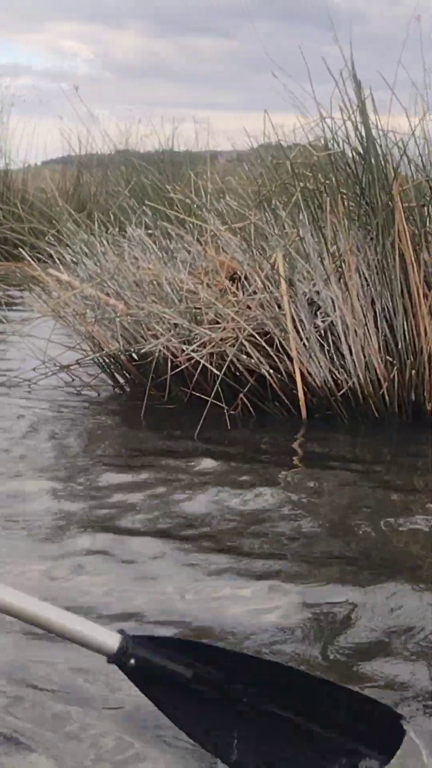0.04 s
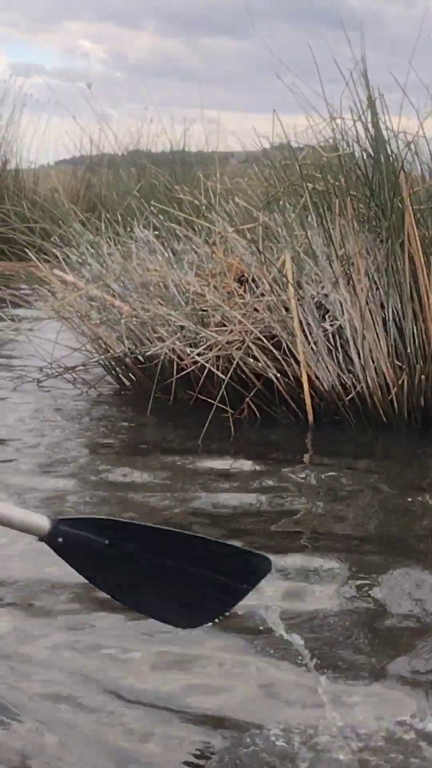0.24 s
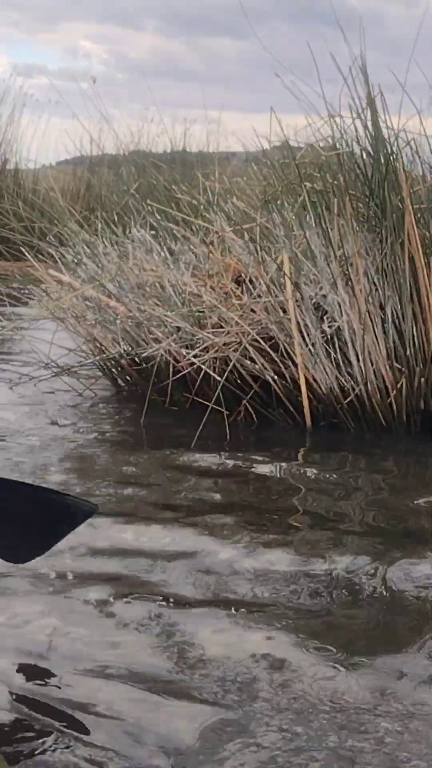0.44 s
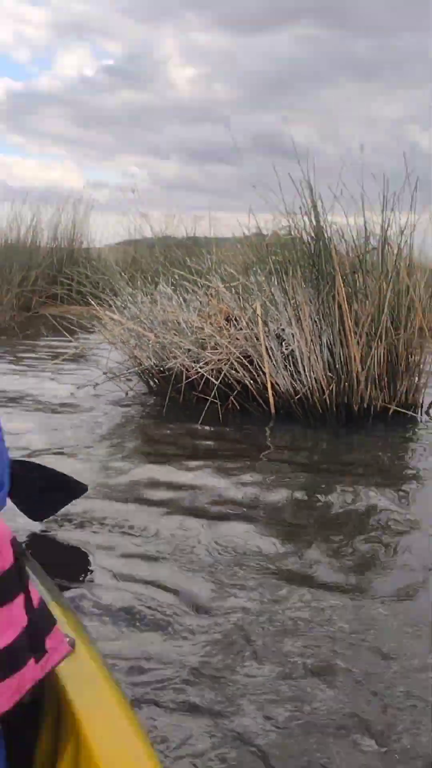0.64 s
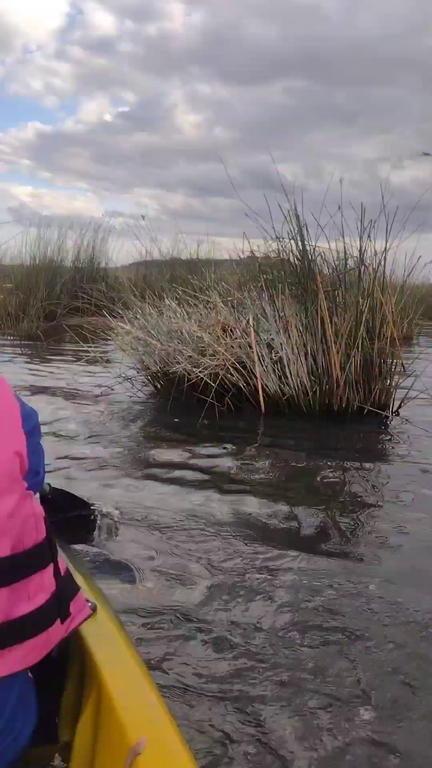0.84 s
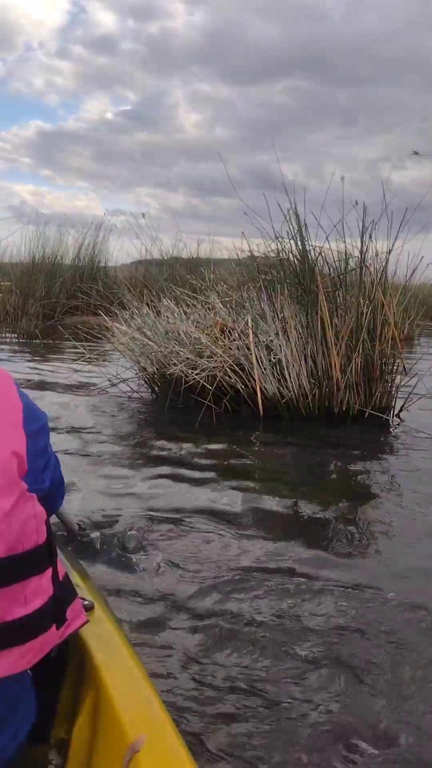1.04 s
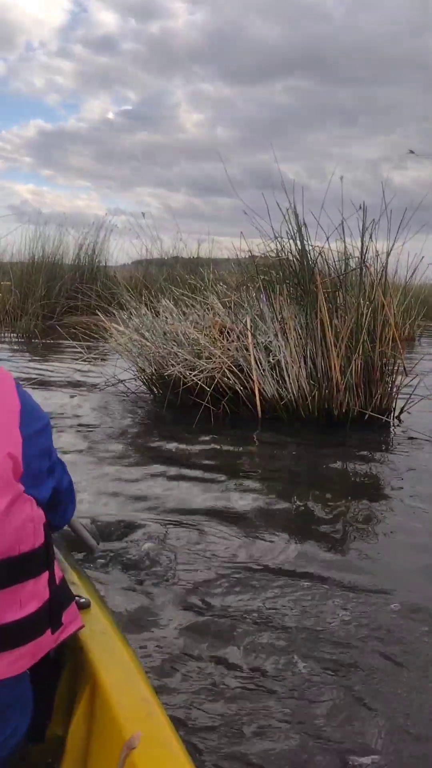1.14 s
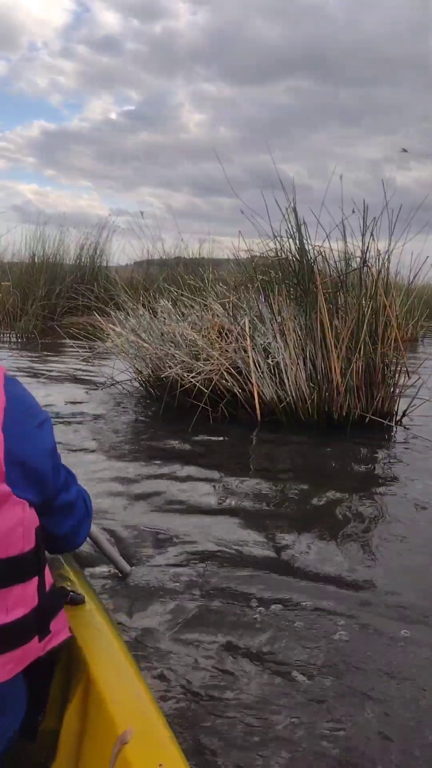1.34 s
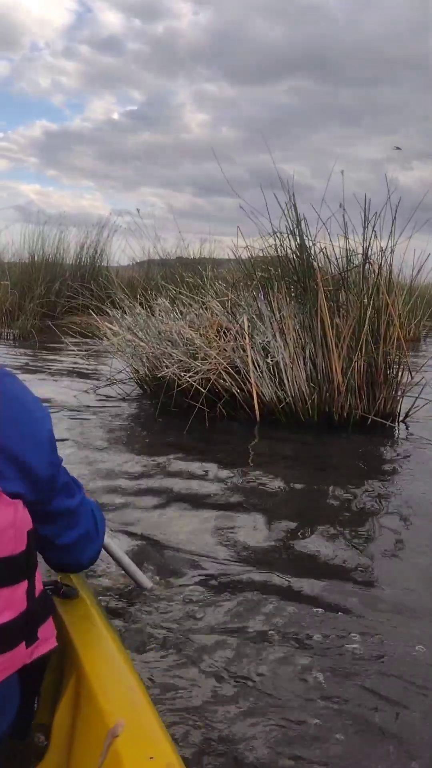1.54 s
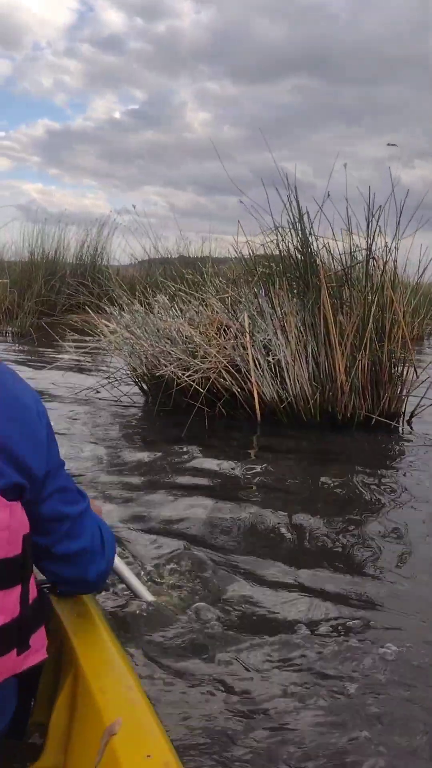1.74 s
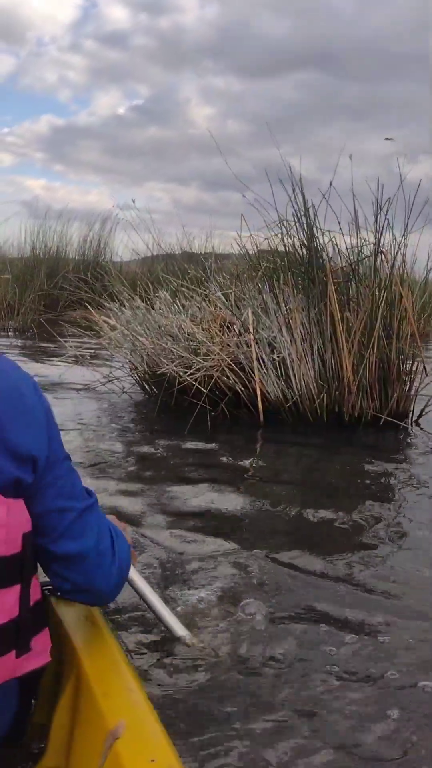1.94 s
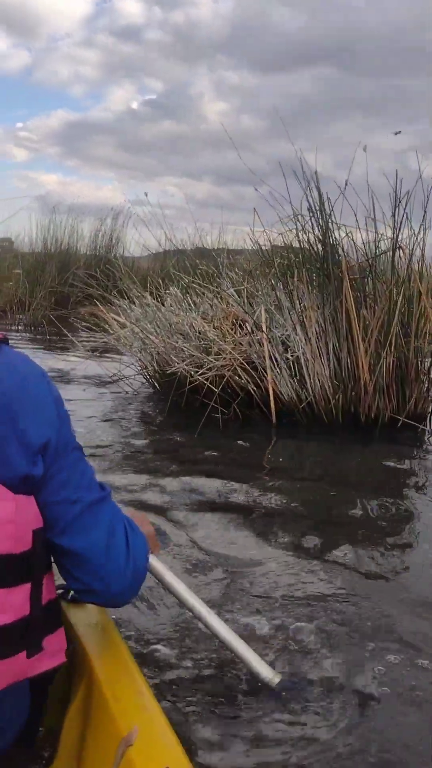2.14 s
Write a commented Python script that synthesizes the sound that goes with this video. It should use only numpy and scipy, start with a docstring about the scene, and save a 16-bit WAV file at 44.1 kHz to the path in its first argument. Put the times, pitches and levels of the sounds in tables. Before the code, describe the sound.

Close hand-held stereo recorder outdoors on open water: patchy low gurgling throughout, a quick bright spray with rubbing clicks, an overloaded jolt, another knock, then calmer bubbling, plops and small drips.

```python
"""Water gurgles along the hull of a kayak among reeds, heard by a small hand-held two-port recorder.
Gurgle, splash and mist are patchy noise mixed with random bubbles; plops, drips and ticks are short fading sines.
A grip rubs the case near the left port: stick-slip clicks ring the case under a thin hiss.
One jolt, a slow pressure curve with thuds and shudders, drives both membranes to their stop. A low rumble runs below."""
import sys
import numpy as np
from scipy import signal
from scipy.fft import rfft, irfft, next_fast_len
from scipy.io import wavfile
from scipy.ndimage import uniform_filter1d, map_coordinates

SR = 44100
rng = np.random.default_rng(int(sys.argv[2]) if len(sys.argv) > 2 else 0)


def store_pcm(level_fs):
    """Save levels as 16-bit WAV."""
    pcm = np.round(np.clip(level_fs, -1, 1) * 32767).astype(np.int16)
    wavfile.write(sys.argv[1], SR, np.atleast_2d(pcm).T)


def gain_from_db(level_db):
    """Convert decibel levels to linear amplitude factors (20 dB per decade)."""
    decades = np.asarray(level_db, float) / 20
    return 10 ** decades


N = 97020


def unit(x):
    """Scale to rms 1."""
    return x / np.sqrt(np.mean(x ** 2) + 1e-20)


def along(points, hz):
    """Read a curve of (Hz, value) points on a logarithmic pitch axis."""
    f, v = np.transpose(points)
    return np.interp(np.log(hz + 1), np.log(f + 1), v)


def curves(rows):
    """Draw straight lines between timed rows: one value per sample for each column after the time."""
    s, *cols = np.transpose(rows)
    return np.array([np.interp(np.arange(N) / SR, s, c) for c in cols])


def wobble(rate):
    """A smooth random curve through rate random points a second."""
    points = rng.standard_normal(int(N * rate / SR) + 4)
    return map_coordinates(points, [np.arange(N) * rate / SR])


def filtered(x, response):
    """Multiply the spectrum of x by a response of frequency, which may be complex."""
    m = next_fast_len(N + SR)
    return irfft(rfft(x, m) * response(np.fft.rfftfreq(m, 1 / SR)), m)[..., :N]


def sides(db):
    """Left and right gain for a left-minus-right level in dB."""
    return gain_from_db(np.array([db / 2, -db / 2]))


def bubbles(s, db, hz, pan_db, turns, rise):
    """Fading sines that climb in pitch, summed to stereo; more turns means a longer ring."""
    length = 900  # samples
    t = np.arange(length) / SR
    hz = hz[:, None]
    u = t * hz / turns
    tone = np.sin(2 * np.pi * hz * t * (1 + rise * np.minimum(u, 3)))
    wave = tone * u ** .5 * np.exp(-2 * u) * gain_from_db(db)[:, None]
    at = ((s * SR).astype(int)[:, None] + np.arange(length)).ravel()
    return np.array([np.bincount(at, (wave * g[:, None]).ravel(), N + length)[:N] for g in sides(pan_db)])


def water(spectrum, count, hz, turns, size_db, grain_db, patchy_db):
    """Patchy noise with random bubbles on it, nearly unrelated at the two ports, scaled to overall rms 1."""
    # left-minus-right tilt of water sound, columns: pitch_hz, left_minus_right_db
    port_tilt = [(110, -26.5), (250, -8), (700, -1.5), (1300, 10), (2400, 4), (4400, -20), (6000, 1.5),
                 (8100, 4), (15000, 2.5)]
    z = signal.stft(rng.standard_normal((2, N)), nperseg=256)[2]
    # smooth random patches over neighbouring pitches and moments
    patches = uniform_filter1d(uniform_filter1d(rng.standard_normal(z.shape), 5, 1), 6, 2)
    bed = signal.istft(z * gain_from_db(patchy_db * unit(patches).clip(-2, 2)), nperseg=256)[1][:, :N]

    # bubbles that lean further to one side are weaker
    g = rng.standard_normal((count, 3)).clip(-2.2, 2.2)
    start_s = rng.random(count) * N / SR
    level_db = size_db * g[:, 2] - 7 * np.abs(g[:, 1])
    pitch_hz = np.clip(hz * np.exp(.5 * g[:, 0]), 280, 15000)
    grains = bubbles(start_s, level_db, pitch_hz, 14 * g[:, 1], turns, rise=0.045)

    def hump(f):
        return 1 + np.log((f + 50) / hz) ** 4

    both = unit(filtered(bed, lambda f: 1 / hump(f))) + gain_from_db(grain_db) * unit(grains)

    # undo the hump, up to a factor of 6, while shaping the spectrum
    def shape(f):
        return gain_from_db(along(spectrum, f)) * sides(along(port_tilt, f)) * hump(f).clip(0, 6)

    return unit(filtered(both, shape))


def swell(db):
    """Uneven gain, mostly shared by the two ports with a little of each port's own."""
    own = np.array([wobble(24.85), wobble(24.69)])
    return gain_from_db(db * (wobble(40.18) + 0.16 * own).clip(-2, 1.5))


def gurgle():
    """Water gurgling along the hull: low noise and many low bubbles that come and go."""
    # loudness before a 3 dB cut and the swell, columns: time_s, left_db, right_db
    loudness = [(0, -34.5, -30.5), (.08, -35, -23.5), (.13, -27, -27), (.25, -34.5, -26), (.36, -32.5, -36),
                (.44, -35.5, -32.5), (.48, -29, -26.5), (.53, -35, -27.5), (.6, -33.5, -24.5),
                (.7, -40, -29.5), (.88, -45, -31.5), (.98, -30.5, -27.5), (1.07, -42, -31.5),
                (1.2, -40, -37.5), (1.26, -31.5, -30), (1.37, -41.5, -29), (1.43, -41.5, -33),
                (1.6, -32.5, -28), (1.75, -39.5, -31), (1.97, -32.5, -32.5), (2.06, -38.5, -30.5),
                (2.13, -42.5, -41.5), (2.18, -39.5, -29.5)]
    # relative tone of the gurgle, columns: pitch_hz, level_db
    tone = [(100, -16), (220, -3), (400, -7.5), (1250, -3.5), (1600, -12), (2500, -41.5), (5000, -40)]
    flow = water(tone, count=2400, hz=650, turns=1.77, size_db=3.5, grain_db=2, patchy_db=6.0)
    return gain_from_db(curves(loudness) - 3.0) * swell(1.77) * flow


def spray():
    """Spray off the paddle blade: ringing splash bubbles and finer, brighter mist."""
    # loudness before the swell and a 2.5 dB lift of the mist, columns: time_s, splash_db, mist_db
    loudness = [(0, -51.5, -60), (.09, -52.5, -61.5), (.16, -39.5, -38.5), (.2, -40, -72), (.27, -46, -50),
                (.35, -46, -54.5), (.43, -56.5, -62), (.53, -56, -52.5), (.9, -59.5, -63.5),
                (.99, -47.5, -58.5), (1.15, -55, -63), (1.45, -52, -62.5), (1.6, -50, -59),
                (1.67, -42, -58), (1.72, -50, -58.5), (1.8, -48, -60), (1.9, -55, -62.5), (2.12, -54, -62)]
    # relative tone of each, columns: pitch_hz, level_db
    splash_tone = [(1200, -14), (1800, 3), (3000, 8), (3550, 2), (4300, 3.5), (5300, 0.5), (7000, -19)]
    mist_tone = [(3000, -8.5), (5500, 1.5), (7500, 3), (10000, 3), (12500, -8), (15500, -10)]
    splash = water(splash_tone, count=4000, hz=3247, turns=7.1, size_db=5.5, grain_db=6, patchy_db=2.5)
    mist = water(mist_tone, count=3000, hz=8830, turns=2.8, size_db=5, grain_db=-5.5, patchy_db=2.5)
    splash_db, mist_db = curves(loudness)
    return swell(1.8) * (gain_from_db(splash_db) * splash + gain_from_db(mist_db + 2.5) * mist)


def rumble():
    """Low rumble through the boat: in step at both ports at the bottom, opposed higher up."""
    # relative tone of the rumble, columns: pitch_hz, level_db
    tone = [(3, 0), (15, 13), (40, 0.5), (100, 0.5), (220, -9.5), (450, -51)]
    twist_hz = 64  # around here the shared part turns from in step to opposed
    shared, left, right = rng.standard_normal((3, N))
    turned = filtered(shared, lambda f: (twist_hz ** 2 - f * f) / (twist_hz ** 2 + f * f))
    lumps = gain_from_db(2.5 * wobble(25.02)) * np.array([shared + 0.63 * left, turned + 0.95 * right])
    # time_s, level_db
    level_db = -34.5 + curves([(0, 8.5), (.3, 3.5), (.6, 6.5), (.9, -3), (1.3, 2), (2.2, 1)])
    return gain_from_db(level_db) * unit(filtered(lumps, lambda f: gain_from_db(along(tone, f))))


def jolt():
    """Slow pressure of the jolt on the two membranes, with its corners slightly rounded."""
    # pressure before the membrane stop, columns: time_s, left, right
    pressure = [(0, 0.02, 0.018), (.2608, -0.11, -0.32), (.2613, 0.25, 0.28), (.266, -0.2, -0.99),
                (.273, -0.53, -0.61), (.279, -1.2, -0.5), (.285, -0.74, -1.08), (.33, -0.68, -0.51),
                (.348, -0.069, -0.17), (.4, 0.5, 0.38), (.47, 0.98, 0.91), (.58, 0.8, 1.0),
                (.72, 0.62, 0.99), (1, 0.36, 0.72)]
    return uniform_filter1d(curves(pressure), 12, 1)


def plops():
    """Low bubbles: fading sines that rise a little in pitch."""
    # level before a 4.5 dB lift, columns: start_s, level_db, pitch_hz, left_minus_right_db
    events = [(0.036, -30, 556, -24), (0.135, -25.5, 1310, 22.5), (0.938, -28.5, 910, -13.5),
              (1.252, -30.5, 744, 8), (1.362, -26, 925, -17), (1.515, -28.5, 1085, -16),
              (1.537, -29.5, 1296, 23.5), (1.783, -27, 1330, 18), (2.058, -28, 985, -11)]
    return gain_from_db(4.5) * bubbles(*np.transpose(events), turns=6.84, rise=0.018)


def drips():
    """Ragged drips off the paddle blade, each broken into four bubbles of nearby time and pitch."""
    # level before a 4.5 dB lift, pitch and time before scatter
    # columns: start_s, level_db, pitch_hz, left_minus_right_db
    events = [(0.1526, -24.5, 4000, -8), (0.167, -24, 3870, -13), (1.1007, -32.5, 2520, -7),
              (1.227, -37.5, 2660, -5), (1.358, -32, 3110, -8), (1.665, -34, 1730, 16),
              (1.8047, -31.5, 4040, -24.5), (1.8538, -35.5, 3770, -17), (1.9432, -38, 4060, -21)]
    spatter_s, pitch_spread = .002, .08
    s, db, hz, pan_db = np.transpose(events)
    total = np.zeros((2, N))
    for late, high in rng.uniform(-1.6, 1, (4, 2, len(s))):
        start_s = s + spatter_s * (1 + late)
        total += bubbles(start_s, db, hz * np.exp(pitch_spread * high), pan_db, turns=5.14, rise=0.028)
    return gain_from_db(4.5) * total


def rubs():
    """Skin sticks and slips unevenly; each slip rings the case, and a thin scuffing hiss swells around it."""
    # strokes of the grip, relative levels: start_s, length_s, level_db, hollow_mode_db
    strokes = [(0.175, .001, -9, -14), (0.185, 0.027, -13, -0.5), (0.2137, 0.00079, -5, -28),
               (0.218, .022, -8.5, 5.5), (0.246, 0.0034, -20, -8), (0.2602, 0.00091, -13.5, -11),
               (0.329, 0.044, -29, 1.5), (0.465, 0.014, -25.5, 5), (0.596, 0.014, -20.5, 0),
               (0.988, 0.0196, -8, -2), (1.015, 0.0007, -2, -4)]
    # ringing modes of the case: pitch_hz, width_hz, level_db
    case_modes = [(196, 250, -7), (895, 290, -5.5), (1330, 99, 2.5), (1525, 440, -0.5)]
    hollow_mode = [(510, 79, 4.5)]  # same columns
    slips_per_s, slip_scatter_db, case_top_hz = 330, 2, 1704
    scuff_hz, scuff_width_hz, scuff_db, smear_s = 7420, 2260, -28, 0.025

    slips, hollow, effort = np.zeros((3, N))
    for s, length, db, hollow_db in strokes:
        r = rng.standard_normal((40, 3)).clip(-1.6, 1.6)
        t = np.cumsum(np.exp(.25 * r[:, 0])) / slips_per_s
        t -= t[0]
        inside = t < length
        at = ((s + t[inside]) * SR).astype(int)
        case_db, mode_db = db + 26.0 + slip_scatter_db * r[inside, 1:].T
        slips[at] += gain_from_db(case_db)
        hollow[at] += gain_from_db(mode_db + hollow_db)
        effort[int(s * SR):int((s + length) * SR)] = gain_from_db(db)

    def modes(rows):
        def response(f):
            soft = signal.freqs(*signal.butter(10, 1, analog=True), f / case_top_hz)[1]
            return soft * sum(gain_from_db(db) * 1j * f * w / (c * c - f * f + 1j * f * w) for c, w, db in rows)
        return response

    ring = filtered(slips, modes(case_modes)) + filtered(hollow, modes(hollow_mode))

    noise = rng.standard_normal((2, N))
    hiss = unit(filtered(noise, lambda f: 1 / (1 + ((f - scuff_hz) / scuff_width_hz * 2) ** 2)))
    smear = int(smear_s * SR)
    swelling = uniform_filter1d(uniform_filter1d(effort, smear), smear)
    scuff = hiss * swelling * gain_from_db(scuff_db + 4.9 * wobble(350))
    # weaker at the right port, in dB
    return ring * gain_from_db([[0], [-26]]) + scuff * gain_from_db([[0], [-12]])


def fling():
    """The blade flings a sheet of fine spray past the right port: a short bright hiss that sputters."""
    centre_s, half_length_s, level_db, low_hz = 0.193, 0.03, -44.5, 4000
    noise = rng.standard_normal((2, N))
    hiss = unit(filtered(noise, lambda f: (f / low_hz) ** 3 / (1 + (f / low_hz) ** 4)))
    shape = np.exp(-((np.arange(N) / SR - centre_s) / half_length_s) ** 4)
    return gain_from_db(level_db + 3.2 * wobble(178.4)) * shape * hiss * sides(-3)[:, None]


def thuds():
    """Thuds on the case: one-sided pushes that rise in about 0.1 ms and die away."""
    # signed push before the membrane stop, columns: start_s, left, right, decay_s
    knocks = [(0.2617, 0.18, -0.76, 0.00042), (0.2628, 0.12, 0.41, 0.014), (0.274, 0.14, -0.26, 0.00053),
              (0.4691, -0.051, 0.44, 0.00036), (0.4706, 0.4, 0.12, 0.00059)]
    t = np.arange(N) / SR
    total = np.zeros((2, N))
    for s, left, right, decay_s in knocks:
        since = np.abs(t - s)
        push = (t > s) * np.exp(-since / decay_s) * (1 - np.exp(-since / .0001))
        total += np.outer([left, right], push)
    return total


def shudders():
    """The case shudders as the membranes come free: low sines that swell and fade."""
    # level before the membrane stop, columns: centre_s, half_length_s, pitch_hz, left_db, right_db
    shakes = [(0.385, 0.025, 99.8, -23, -26), (0.481, 0.011, 125, -43, -16.5)]
    t = np.arange(N) / SR
    total = np.zeros((2, N))
    for s, width_s, hz, *db in shakes:
        total += np.outer(gain_from_db(db), np.sin(2 * np.pi * hz * t) * np.exp(-((t - s) / width_s) ** 2))
    return total


def ticks():
    """Bright ticks: each is six very short sines, the later ones higher, softened at the top."""
    # level of each sine, pitch and time before scatter
    # columns: start_s, level_db, pitch_hz, left_minus_right_db
    events = [(0.4695, -15, 8000, 13.5), (0.6583, -29.5, 7500, 17), (1.3624, -29.5, 6300, 11),
              (1.67, -17.5, 10200, 8), (1.7525, -21.5, 9100, 8), (1.8055, -22.5, 10200, 9),
              (2.184, -24, 6800, -9)]
    spread_s, top_hz = .0008, 12400
    s, db, hz, pan_db = np.transpose(events)
    total = np.zeros((2, N))
    for b in rng.uniform(-1.6, 1, (6, len(s))):
        total += bubbles(s + spread_s * (1 + b), db, hz * np.exp(0.14 * b), pan_db, turns=0.92, rise=0.036)
    return filtered(total, lambda f: 1 / (1 + (f / top_hz) ** 6))


def scene():
    """Everything that reaches the two ports."""
    wet = gurgle() + spray() + plops() + drips() + fling() + ticks()
    handled = rumble() + jolt() + rubs() + thuds() + shudders()
    return wet + handled


def band_limit(x):
    """A steep low-pass at the top of the band."""
    return signal.sosfilt(signal.butter(12, 16580, fs=SR, output="sos"), x)


def record(dry):
    """The membranes meet a soft stop on inward swings; a coupling capacitor drains steady pressure."""
    stop, knee = 0.57, 4  # furthest inward swing, sharpness of the stop
    coupling_hz, top_hz = 5.8, 15700
    inward = np.maximum(-dry, 0)
    stopped = dry / (1 + (inward / stop) ** knee) ** (1 / knee)
    held = np.pad(stopped, [(0, 0), (0, SR // 10)], 'edge')  # hold the last value past the end
    out = filtered(held, lambda f: 1j * f / (coupling_hz + 1j * f) * (f < top_hz))
    return band_limit(out)


dry = scene()
out = record(dry)
store_pcm(out)
```